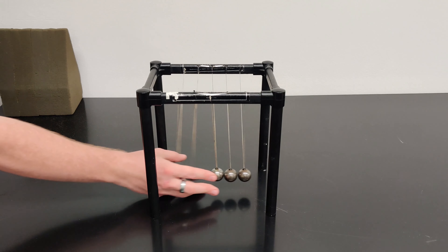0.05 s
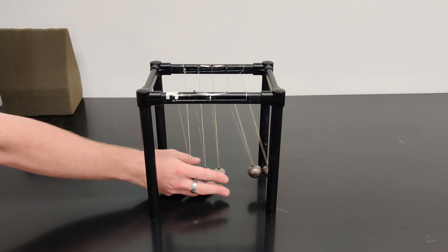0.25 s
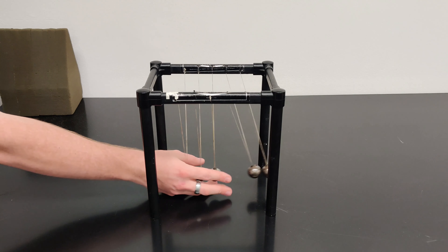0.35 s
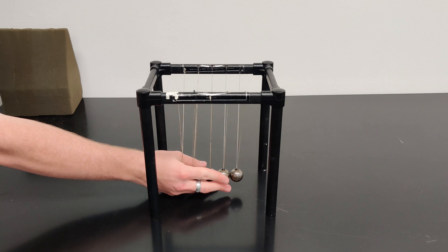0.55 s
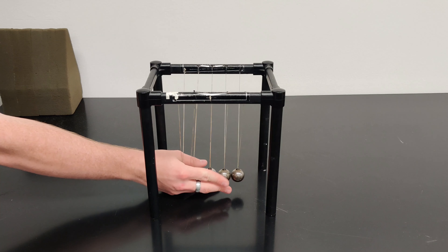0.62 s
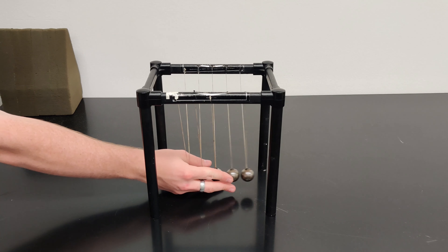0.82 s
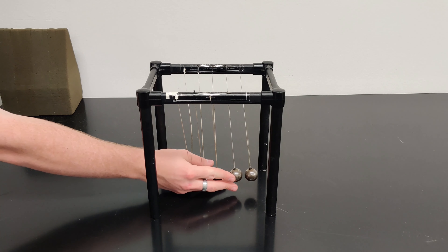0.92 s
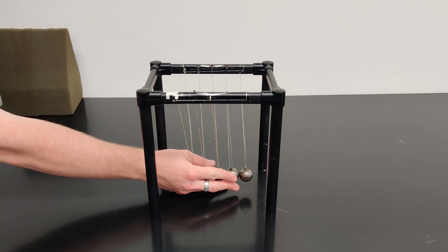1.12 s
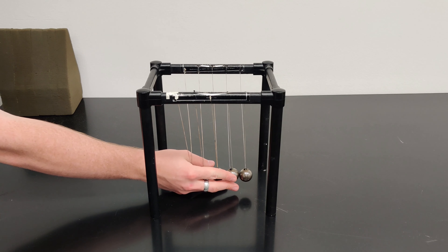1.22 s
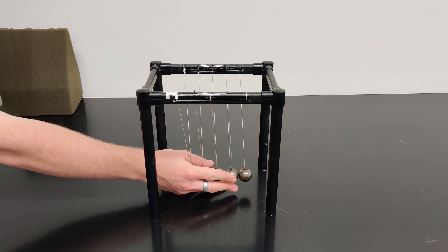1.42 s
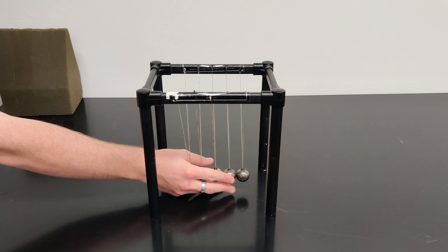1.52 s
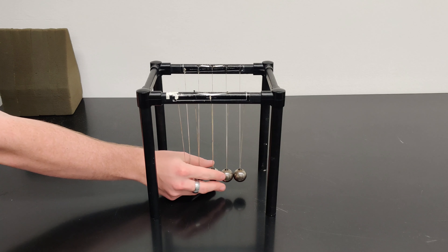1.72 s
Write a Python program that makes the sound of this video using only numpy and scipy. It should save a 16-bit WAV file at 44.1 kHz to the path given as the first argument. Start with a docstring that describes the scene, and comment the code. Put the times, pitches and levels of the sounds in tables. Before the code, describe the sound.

Steel balls of a desk cradle clack sharply at about 0.2 and 0.6 seconds, each strike leaving a brief, high metallic ring. From 0.8 seconds they click and chatter more weakly and unevenly as a hand stops them, with a clearer click near 1.2 seconds and last faint ticks around 1.7. The sound is close, with a short small-room echo and soft ventilation hum throughout.

```python
"""A Newton's cradle on a desk in a small room, heard close on a stereo pair of microphones.
Ventilation rumbles and hums softly throughout, under the last of an earlier clack at the start.
The steel balls clack twice, each time leaving the cradle ringing, then tick and chatter against each
other as a hand stops them. Every click glances off the desk and rings out in the room."""
import sys
import numpy as np
from scipy import signal
from scipy.fft import rfft, irfft
from scipy.io import wavfile
from scipy.ndimage import uniform_filter1d, map_coordinates

SR = 44100
rng = np.random.default_rng(int(sys.argv[2]) if len(sys.argv) > 2 else 0)


def pcm_store(signal):
    """Save signal as 16-bit PCM."""
    levels = np.round(np.clip(np.atleast_2d(signal), -1, 1) * 32767)
    wavfile.write(sys.argv[1], SR, levels.astype(np.int16).T)


N = 77175
SIZE = 32768  # samples in one click or ring
FREQS, TIMES = np.fft.rfftfreq(SIZE, 1 / SR), np.arange(SIZE) / SR


def amp(db):
    """Decibels to gain."""
    return 10 ** (np.asarray(db) / 20)


def unit(x):
    """Scaled to rms 1."""
    return x / np.sqrt(np.mean(x ** 2) + 1e-20)


def along(points, hz):
    """A curve through (Hz, value) points on a log frequency axis."""
    f, v = np.transpose(points)
    return np.interp(np.log(hz + 1), np.log(f + 1), v)


def pan(db):
    """Left and right gains, the left louder by db."""
    return amp(db * np.array([[.5], [-.5]]))


def wobble(rate):
    """A smooth random curve, rate knots a second."""
    return map_coordinates(rng.standard_normal(256), [np.arange(N) * rate / SR], mode="wrap")


def delay(seconds):
    """Spectrum of a pure delay."""
    return np.exp(-2j * np.pi * FREQS * seconds)


def causal(gain):
    """The minimum-phase response with this gain."""
    cepstrum = irfft(np.log(np.maximum(gain, 1e-6)))
    cepstrum[1:SIZE // 2] *= 2
    cepstrum[SIZE // 2 + 1:] = 0
    return np.exp(rfft(cepstrum))


def add(out, x, start):
    """Mix x into out from start, in seconds."""
    i = round(start * SR)
    x = x[:, max(-i, 0):max(N - i, 0)]
    out[:, max(i, 0):max(i, 0) + x.shape[1]] += x


def ventilation(air_db=-55, rumble_db=-54, rumble_hz=14.3):
    """Behind the desk: steady air noise, a deep rumble and a slightly wavering hum to the left."""
    # Air noise. Each row: frequency in Hz, relative level per Hz in dB.
    air_colour = [(22, -7), (40, -16), (70, -19.5), (100, -21.5), (140, -24.5), (200, -28.5), (400, -31.5),
                  (700, -31), (1050, -41.5), (1400, -39), (2300, -45), (5000, -50), (8000, -54),
                  (12000, -49.5), (15500, -49.5)]
    # Each row: frequency in Hz, correlation of the air noise between the microphones.
    air_likeness = [(30, 0.89), (150, 0.92), (500, 0.25), (1500, 0.1), (10000, 0.29)]
    # Hum tones. Each row: frequency in Hz, level in dB.
    hum_tones = [(119.6, -69.5), (178.5, -74.5), (269, -79), (357, -70.5), (443, -78), (477, -82),
                 (514, -71.5), (549, -86), (1427, -78)]
    hz, t = np.fft.rfftfreq(N, 1 / SR), np.arange(N) / SR
    width = np.arccos(np.clip(along(air_likeness, hz), -1, 1)) / 2
    spectrum = rfft(rng.standard_normal((2, N))) * amp(along(air_colour, hz))
    mid, side = irfft(spectrum * [np.cos(width), np.sin(width)], N)
    air = unit(np.array([mid + side, mid - side]))
    rumble = unit(irfft(rfft(rng.standard_normal(N)) * hz / (1 + (hz / rumble_hz) ** 4), N))
    hum = sum(amp(db + wobble(5.37)) * unit(np.sin(2 * np.pi * f * t + .3 * wobble(6)))
              for f, db in hum_tones)
    return amp(air_db) * pan(1.5) * air + amp(rumble_db) * rumble + pan(5) * hum


def room(tail_db=-6.5, near_db=-4.5, near_t60_s=0.099, rise_s=0.0065):
    """Stereo spectrum of the room's answer: dense near reflections over a longer tail."""
    # The tail's decay. Each row: frequency in Hz, seconds to fall 60 dB.
    tail_t60 = [(500, 1), (2500, 0.7), (5000, 0.56), (8000, 0.41), (12000, 0.33), (15000, 0.28)]
    hz, frame_s, noise = signal.stft(rng.standard_normal((2, SIZE)), SR, nperseg=256)
    decay = amp(-60 * frame_s / along(tail_t60, hz)[:, None])
    tail = signal.istft(noise * decay, SR, nperseg=256)[1][:, :SIZE]
    near = rng.standard_normal((2, SIZE)) * amp(-60 * TIMES / near_t60_s)
    rise = 1 - np.exp(-TIMES / rise_s)
    return rfft(amp(tail_db) * unit(tail * rise) + amp(near_db) * unit(near * rise)) / np.sqrt(SIZE)


def contact(t60_s=0.0046, scatter_db=2):
    """Levelled spectrum of one contact: a spike scattered briefly along the row of balls."""
    burst = rng.standard_normal(SIZE) * amp(-60 * TIMES / t60_s)
    spectrum = 1 + amp(scatter_db) * rfft(burst / np.linalg.norm(burst))
    return spectrum / np.sqrt(uniform_filter1d(abs(spectrum) ** 2, size=500) + 1e-9)


def click(corner_hz, body_db, room_db):
    """Steel on steel at the microphones, with its echoes; a softer contact has a lower corner."""
    # Colour of a click. Each row: frequency in Hz, gain in dB.
    clack_colour = [(200, -48.5), (700, -35), (1000, -26.5), (1300, -12.5), (1650, -16.5), (2000, -5.5),
                    (2400, -7), (3000, -0.5), (3550, -1.5), (4300, 4.5), (5050, 4.5), (5650, 2.5),
                    (6250, 2.5), (7200, -0.5), (8500, 2), (9300, -3), (10400, 0), (12800, -3.5),
                    (14300, -4), (15000, -2.5), (16800, -20.5)]
    # The direct sound at the pair. Each row: frequency in Hz, left over right in dB.
    balance = [(1000, 2.5), (3000, 3.5), (5500, 2.5), (8500, -.5), (15000, -1)]
    # Echoes off desk and walls. Each row: delay in seconds, level in dB, left over right in dB.
    reflections = [(.0025, -7, 2), (.0033, -12, 2), (.0128, -19, 3), (.0160, -18, 4), (.0195, -17, -5)]
    body_hz, body_octaves, echo_corner_hz = 2770, 0.67, 10000
    body = np.exp(-(np.log2((FREQS + 1) / body_hz) / body_octaves) ** 2)
    colour = amp(along(clack_colour, FREQS) + body_db * body)
    colour /= np.sqrt(1 + (FREQS / corner_hz) ** 8.5)
    direct = pan(along(balance, FREQS)) * contact()
    echoes = sum(amp(db) * pan(side_db) * delay(lag) * contact() for lag, db, side_db in reflections)
    echoes /= 1 + 1j * FREQS / echo_corner_hz  # duller than the direct click
    arrival = np.array([delay(0), delay(36e-6)])  # the right microphone hears it just later
    heard = irfft(causal(colour) * ((direct + echoes) * arrival + amp(room_db) * room()))
    return heard * (np.arange(SIZE) < SIZE * 3 // 4)


def jostle(ticks_per_s=60, spread_db=2.5):
    """Faint uneven ticks as the balls jostle against the fingers."""
    # Each row: start in seconds, end in seconds, level in dB.
    spells = [(0.491, .525, -34.5), (0.594, .63, -38), (0.926, 1.04, -39.5), (1.265, 1.35, -29.5),
              (1.35, 1.43, -40.5), (1.686, 1.728, -32)]
    out = np.zeros((2, N))
    ticks = [click(corner_hz=6200, body_db=3.5, room_db=1) for _ in range(4)]
    for start, end, db in spells:
        for k, (late, strength) in enumerate(zip(rng.random(32), rng.standard_normal(32))):
            when = start + (k + late) / ticks_per_s
            if when < end:
                add(out, amp(db + spread_db * strength) * ticks[k % len(ticks)], when)
    return out


def cradle_ring(high_db, high_above_hz=5900):
    """The cradle's shimmer: close modes beat against each other, differently at each microphone."""
    # Clusters of modes. Each row: centre in Hz, width in Hz, level in dB, seconds to fall 60 dB.
    clusters = [(4300, 100, -14, 0.69), (4740, 120, -22.5, 0.31), (5054, 130, 0.5, 0.41),
                (5280, 180, -0.5, 0.35), (5540, 120, -15, 0.69), (6070, 260, -17, 0.53),
                (8000, 140, -19, 0.31), (9530, 87, 3, 0.088)]
    out = np.zeros((2, SIZE))
    for hz, width, db, t60 in clusters:
        phases = np.exp(2j * np.pi * rng.random((2, len(FREQS))))
        modes = unit(irfft(phases / (1 + (2 * (FREQS - hz) / width) ** 2)))
        out += amp(db + high_db * (hz > high_above_hz) - 60 * TIMES / t60) * modes
    return out


def balls():
    """The balls strike each other; the two full swings set the cradle ringing."""
    # Contacts. Each row: start in seconds, level in dB, treble corner in Hz, body in dB, room in dB.
    # The first falls before the start, so only its tail is heard.
    strikes = [(-.19, 1, 10000, -3, 0), (0.2188, -2.5, 12000, -7.5, -2), (.2190, -6, 12100, -17, 0.5),
               (0.227, -13, 14400, 1.5, 4.5), (0.2285, -7.5, 14600, -30, -7), (.2298, -4, 12100, -1.5, -2),
               (0.532, -23.5, 8500, 0, -0.5), (.583, -29, 5940, 3, 5.5), (.6408, -5.5, 15200, 5, -14),
               (0.6418, 2, 12400, 2.5, -2.5), (0.8201, -20, 6470, 4, -8), (0.823, -10, 6730, -0.5, 0.5),
               (0.8288, -13, 9000, -7, -6), (.8360, -15, 9600, -7, -1.5), (0.8419, -18.5, 9400, -2, -10),
               (1.055, -24, 6550, 3, -2), (1.078, -30, 5900, 1, 1), (1.1556, -17.5, 10800, -5, -4),
               (1.2329, -10.5, 7260, -4, -2.5), (1.2346, -13.5, 6040, 1.5, -5.5),
               (1.3017, -25, 6900, -1.5, -2), (1.6299, -21.5, 5260, 1.5, -3.5), (1.675, -31, 5540, 2, 2.5)]
    # Rings. Each row: start in seconds, level in dB, extra gain on the high modes in dB.
    full_swings = [(0.2181, -54, 11), (0.642, -41.5, -33)]
    out = np.zeros((2, N))
    for start, db, corner_hz, body_db, room_db in strikes:
        add(out, amp(db) * click(corner_hz, body_db, room_db), start)
    for start, db, high_db in full_swings:
        add(out, amp(db) * cradle_ring(high_db), start)
    return out


def scene():
    """The cradle close by, the ventilation behind."""
    return balls() + jostle() + ventilation()


def record(dry):
    """The recorder keeps nothing above its band limit."""
    top_hz = 16500
    passband = np.fft.rfftfreq(2 * N, 1 / SR) < top_hz
    return irfft(rfft(dry, 2 * N) * passband)[:, :N]


dry = scene()
out = record(dry)
pcm_store(out)
```